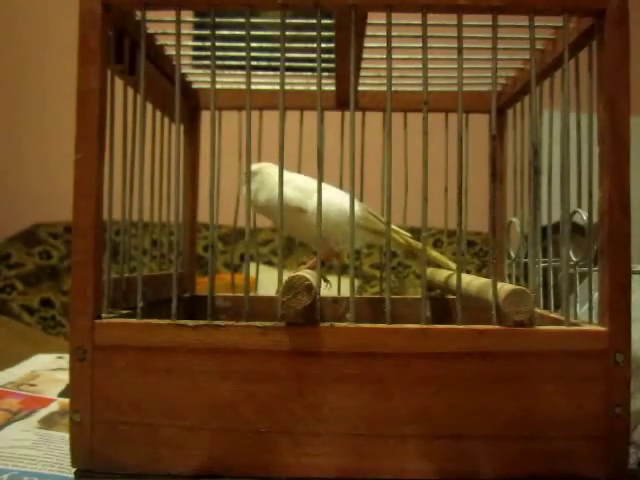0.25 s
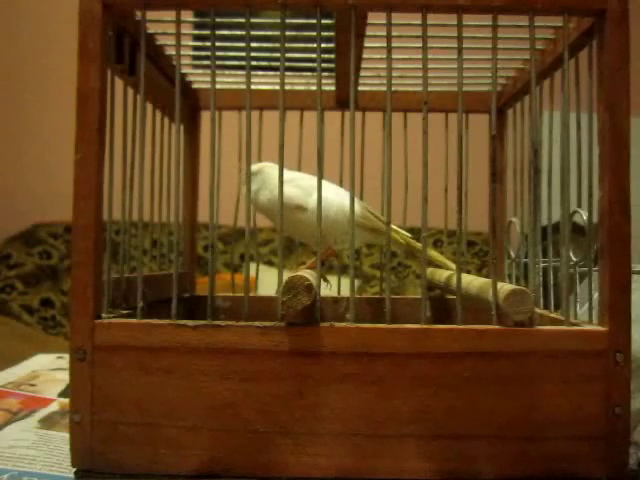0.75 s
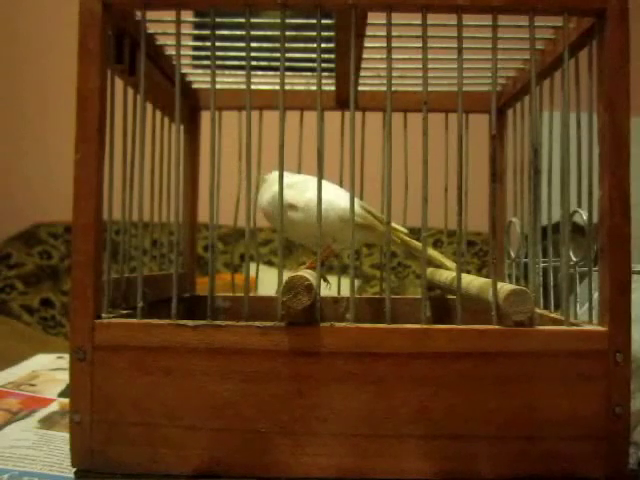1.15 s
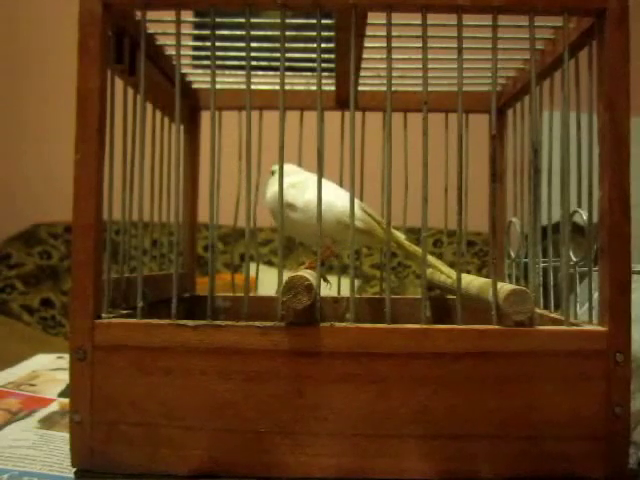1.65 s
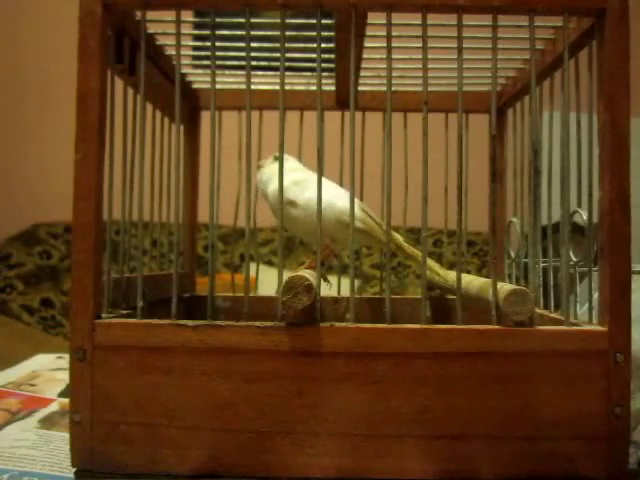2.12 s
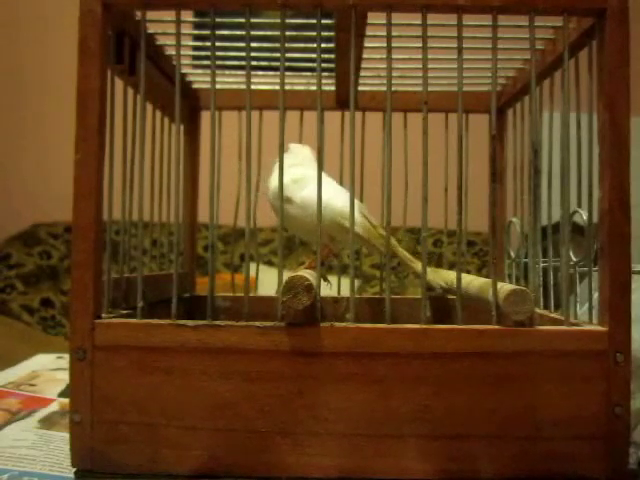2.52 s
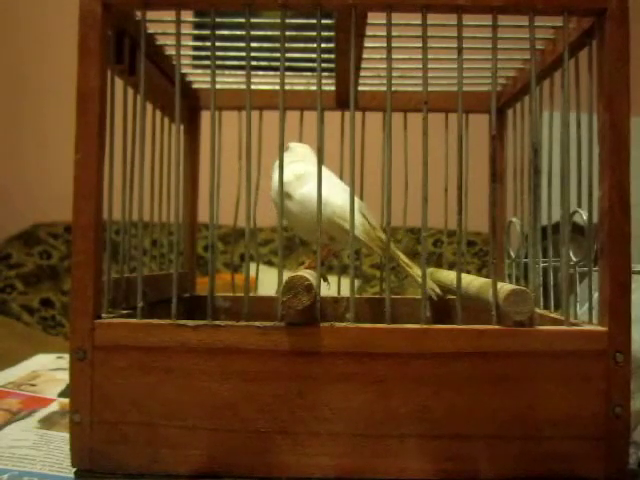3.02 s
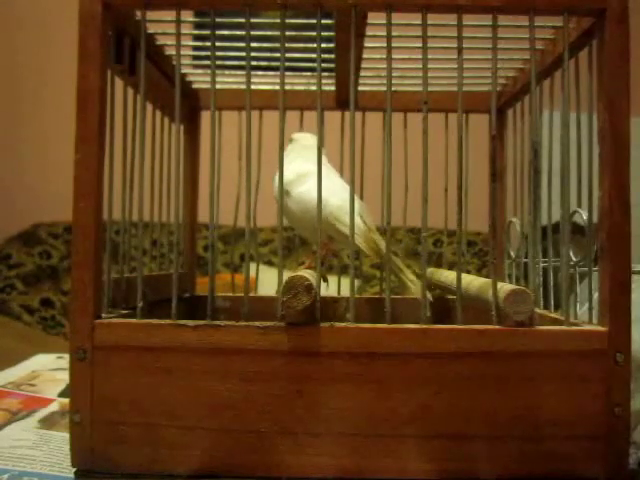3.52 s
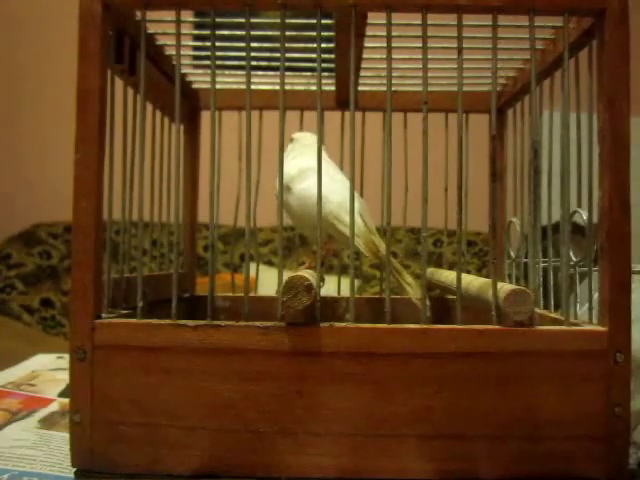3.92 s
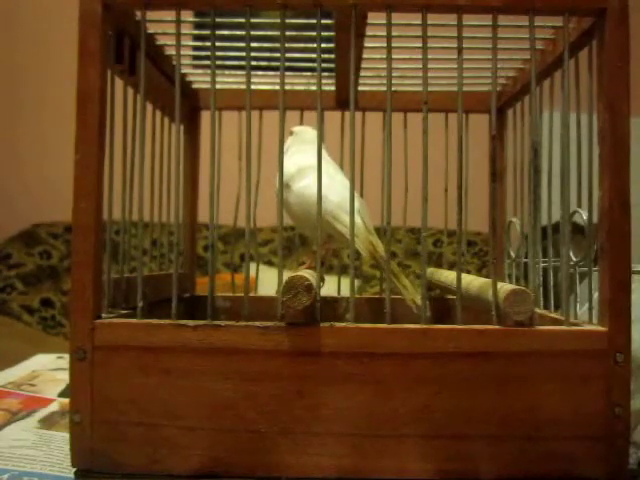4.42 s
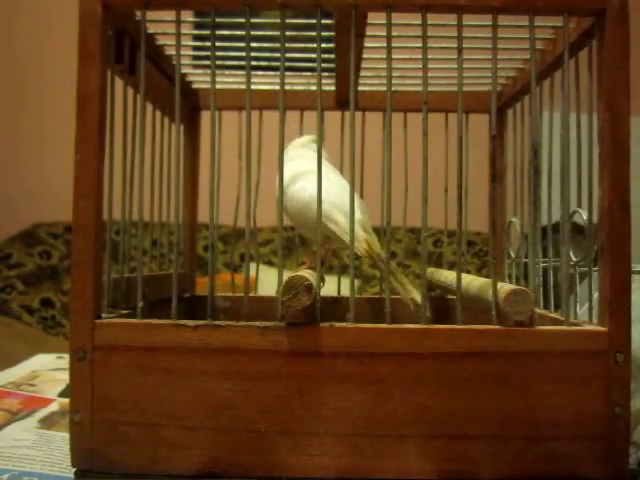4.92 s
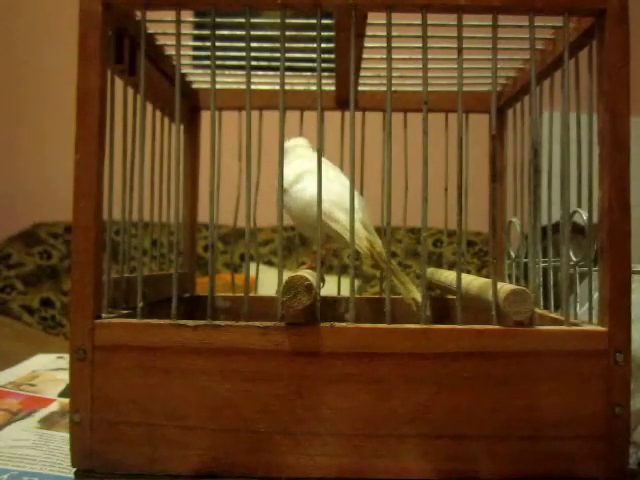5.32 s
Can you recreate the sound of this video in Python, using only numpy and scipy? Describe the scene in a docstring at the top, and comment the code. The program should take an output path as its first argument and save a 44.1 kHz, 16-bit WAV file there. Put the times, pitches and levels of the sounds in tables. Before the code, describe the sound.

Indoors, a canary's thin slurs and short rasps lead into a steady run of loud repeated notes, with faint hoots farther off.

```python
"""Caged canary in a small room.

Soft slurs, thin whistles and harsh rasps, then eight loud repeated syllables, from a wooden cage.
The two sides of the syrinx sound at once and modulate each other.
A faint rising hoot, perhaps another bird, repeats farther off over a low room rumble."""
import sys
import numpy as np
from scipy import signal
from scipy.fft import rfft, irfft, next_fast_len
from scipy.io import wavfile
from scipy.ndimage import map_coordinates

SR = 44100
rng = np.random.default_rng(int(sys.argv[2]) if len(sys.argv) > 2 else 0)


def to_wav(s):
    """Save 16-bit WAV."""
    ch = np.atleast_2d(s).T  # columns
    pcm = np.round(np.clip(ch, -1, 1) * 32767)  # PCM
    wavfile.write(sys.argv[1], SR, pcm.astype(np.int16))


N = 244755
T = np.arange(N) / SR

# Repeated syllables. Each row: accent peak time in seconds, accent level in dB, pitch dip in Hz,
# dip width in seconds, arch height in Hz, time stretch, upper and lower voice levels in dB,
# roughness 0-1, lead of the first tick in seconds.
SYLLABLE_ROWS = [(2.785, -18.5, 200, 0.0046, 554, .86, -37, -44, 0.11, .051),
                 (3.139, -18, 62.5, 0.0029, 546, 0.94, -36, -45, 0.14, 0.056),
                 (3.509, -24.5, 665.5, .012, 702, 0.89, -35, -45, 0.34, .062),
                 (3.873, -18.5, 300, .0082, 534.6, 0.87, -33, -45, 0.22, .058),
                 (4.234, -15, 120, 0.0034, 609, 0.94, -36.5, -43, 0.13, .05),
                 (4.608, -15.5, 79.7, .012, 622, 1.0, -36, -43.5, 0.11, .06),
                 (4.980, -14.5, 419.3, .005, 634, .97, -37, -42, 0.2, .054),
                 (5.353, -16, 23.99, .0035, 673.3, 0.8, -36.5, -41, 0.06, .06)]
# Spectrum of the bird's hiss and scrape. Each row: frequency in Hz, level in dB.
HARSH_SPECTRUM = [(450, -27.5), (750, -4), (1000, 4.5), (1400, -3.5), (2100, 5.5), (2550, -2), (3050, -0.5),
                  (3450, -9), (4200, -18), (6000, -43)]
VOICE_END_S, VOICE_RELEASE_S = 0.25, 0.035  # both voices of a syllable stop together


def syllables():
    """A loud falling accent, then both voices glide up together. Returns accents and soft parts."""
    # Response of the open beak. Each row: frequency in Hz, gain in dB.
    beak_response = [(1000, -9), (3600, 5.5), (4100, -10), (5000, -10), (6000, -26.5)]
    accents, soft, scrape = np.zeros((3, N))
    t = np.arange(-SR // 10, SR // 3) / SR  # zero at the accent peak
    for peak_s, accent_db, dip_hz, dip_s, arch_hz, stretch, upper_db, lower_db, rough, _ in SYLLABLE_ROWS:
        push = np.exp(-(t / 0.012) ** 2)  # bell of air pressure
        sag = np.exp(-np.abs(t / dip_s) ** 3)  # pitch sags and cracks under the push

        lower_hz, lower_gain = lower_contour(t / stretch)
        bright_db = 7 * np.clip(t / 0.4, 0, 1)
        reed = voice(t, lower_hz, [bright_db - 5, bright_db - 22], jitter=0.0071, rough=0.14)
        lower = lower_gain * amp(lower_db + 5 * push + 4.9 * np.tanh(wobble(t, 60))) * reed

        upper_hz, upper_gain = upper_contour(t / stretch, arch_hz)
        upper_hz -= dip_hz * sag
        accent = voice(t, upper_hz, [20 * np.log10(rough) - 4.5], jitter=0.0067, rough=rough)
        accent *= 1 + sag * rough * wobble(t, 3500)
        upper_gain *= amp(upper_db + 4.5 * np.tanh(wobble(t, 55)))
        upper = upper_gain * voice(t, upper_hz, [], jitter=0.0083, rough=0.15 + 0.083 * arch(t / stretch))

        # lower voice modulates upper: faint sum and difference tones
        start_s = peak_s + t[0]
        add(accents, start_s, amp(accent_db) * push * accent * (1 + 0.049 * reed))
        add(soft, start_s, upper * (1 + 0.056 * reed) + lower)
        add(scrape, start_s, amp(accent_db - 29.5) * push)
    accents = filtered(accents, lambda hz: amp(along(beak_response, hz)))
    return accents, soft + scrape * noise(HARSH_SPECTRUM)


def upper_contour(t, arch_hz):
    """Upper voice pitch and gain: swoops down, holds, then arches up unsteadily while fading."""
    held_hz, swoop_hz, swoop_s = 2389.6, 463.7, 0.034
    arch_db, fade_db_per_s = 0.35, 30.5
    swoop = 1 - envelope(t, -swoop_s - 0.008, 1, swoop_s, VOICE_RELEASE_S)
    hz = held_hz + swoop_hz * swoop + arch_hz * arch(t)
    wander = 0.011 * np.sqrt(arch(t)) * wobble(t, 70)
    gate = envelope(t, -0.04147, VOICE_END_S, attack_s=0.025, release_s=VOICE_RELEASE_S)
    return hz * (1 + wander), gate * amp(arch_db * arch(t) - fade_db_per_s * t)


def lower_contour(t):
    """Lower voice pitch and gain: scoops up, then follows the arch a little at even gain."""
    held_hz, scoop_hz, scoop_s, arch_hz = 1555, 104.74, 0.02, 56
    scoop = np.exp(-np.maximum(t + 0.005, 0) / scoop_s)
    hz = held_hz - scoop_hz * scoop + arch_hz * arch(t)
    gate = envelope(t, -0.0233, VOICE_END_S, attack_s=0.007, release_s=VOICE_RELEASE_S)
    return hz * (1 + 0.005 * wobble(t, 14)), gate


def arch(t):
    """Rounded rise of tension late in a syllable, 0-1."""
    peak_s, width_s = 0.174, 0.066
    return np.exp(-np.abs((t - peak_s) / width_s) ** 2.6)


def chucks():
    """Two ticks with a short low ring and a soft hoarse note ahead of each syllable."""
    chuck_hz, tick_t60_s, second_lead_s = 1120, 0.035, 0.044
    out, scrape = np.zeros((2, N))
    t = np.arange(SR // 10) / SR
    tick = amp(-39 - 60 * t / tick_t60_s)
    gain = amp(-46) * envelope(t, 0, 0.034, attack_s=0.0027, release_s=0.019)
    for peak_s, *_, first_lead_s in SYLLABLE_ROWS:
        add(out, peak_s - first_lead_s, gain * voice(t, chuck_hz, [-12], jitter=0.013, rough=0.16))
        add(scrape, peak_s - first_lead_s, amp(-5) * gain)
        for lead_s, db in [(first_lead_s, 0), (second_lead_s, -2.5)]:
            ring = np.sin(2 * np.pi * chuck_hz * rng.normal(1, 0.03) * t)
            add(scrape, peak_s - lead_s, amp(db) * tick)
            add(out, peak_s - lead_s, amp(db - 5) * tick * ring)
    return out + scrape * noise(HARSH_SPECTRUM)


def slurs():
    """Slurs, thin whistles and one echo; each scoops onto a held pitch and off. Rough ones hiss."""
    # Each row: start and length in seconds, start, held and end pitch in Hz, level in dB, roughness 0-1.
    # The row at 0.368 s is the room's fluttering ring after the loud short note.
    tones = [(-.01, .026, 3424, 3305, 2940, -41.5, 0.1), (0.171, 0.05, 2535, 2439, 2480, -35, 0.23),
             (0.203, .06, 2248, 1944, 1980, -36.5, .25), (0.234, .064, 1904, 1944, 1800, -35.5, 0),
             (0.315, 0.033, 1778, 1653, 1600, -34, .1), (0.35, 0.01433, 1615, 1475, 1310, -26.5, 0),
             (0.368, 0.049, 1624, 1558, 1536, -38.5, 0.19), (1.376, .034, 2810, 2605, 2450, -46, 0),
             (1.72, 0.036, 4174, 3882, 3875, -35.5, 0.1), (1.913, 0.057, 1153, 1083, 1055, -42, 0.14),
             (1.996, .035, 4220, 3853, 4020, -31, .06), (2.019, .024, 3930, 3807, 3700, -31, 0),
             (2.261, 0.017, 2920, 2680, 2600, -40.5, 0), (2.299, 0.026, 3200, 3860, 4000, -39.5, .1),
             (2.303, 0.049, 3807, 4006, 3820, -31, 0.05), (2.337, 0.015, 3700, 3329, 3080, -35.5, 0)]
    bend_power, edge_s = 3.7, 0.0077  # higher power: quicker scoops
    out, hiss = np.zeros((2, N))
    for start_s, length_s, start_hz, held_hz, end_hz, db, rough in tones:
        t = np.arange(int(length_s * SR)) / SR
        onto_hz = (start_hz - held_hz) * (1 - t / length_s) ** bend_power
        off_hz = (end_hz - held_hz) * (t / length_s) ** bend_power
        octave_db = -6.5 - 14 * np.log2(held_hz / 1500)  # low tones are reedier
        tone = voice(t, held_hz + onto_hz + off_hz, [octave_db], jitter=0.01, rough=1.4 * rough)
        gain = amp(db) * envelope(t, 0, length_s, edge_s, edge_s)
        add(out, start_s, gain * tone)
        add(hiss, start_s, gain * rough)
    return out + hiss * noise(HARSH_SPECTRUM)


def rasps():
    """Two clashing voices buzz over a hiss, then break into one crack of noise."""
    # Each row: start and lower voice length in seconds, lower and upper pitch in Hz, voice and hiss
    # levels in dB, crack delay in seconds, crack level in dB, crack T60 in seconds.
    calls = [(1.552, 0.028, 1314, 1826, -35, -44, .057, -34.5, 0.16),
             (1.83, .046, 1291, 1858, -36, -42.5, 0.069, -25, 0.027),
             (2.129, .046, 1318, 1780, -34.5, -41, .058, -30, 0.18),
             (2.435, 0.056, 1336, 1768, -34, -39.5, .063, -31, 0.48)]
    upper_delay_s, upper_length_s = 0.018, 0.038
    out, breakup = np.zeros((2, N))
    t = np.arange(SR // 5) / SR
    spread = 1.23 * (t - 0.035)  # the voices drift apart
    for start_s, length_s, lower_hz, upper_hz, db, hiss_db, crack_s, crack_db, crack_t60_s in calls:
        lower = voice(t, lower_hz * (1 - spread), [-9], jitter=0.021, rough=0.1)
        lower *= envelope(t, 0, length_s, attack_s=0.008, release_s=0.0096)
        upper = voice(t, upper_hz * (1 + spread), [-18], jitter=0.018, rough=0.18)
        upper *= envelope(t - upper_delay_s, 0, upper_length_s, attack_s=0.0056, release_s=0.0051)
        add(out, start_s, amp(db) * (lower + amp(-2) * upper * (1 + 0.16 * lower)))
        hiss = amp(hiss_db) * envelope(t, 0, crack_s, attack_s=0.033, release_s=0.01)
        crack = amp(crack_db - 60 * np.abs(t - crack_s) / crack_t60_s)
        crack *= envelope(t - crack_s, -0.002, 0.046, attack_s=0.004, release_s=0.02)
        add(breakup, start_s, (hiss + crack) * amp(2.7 * np.tanh(wobble(t, 260))))
    return out + breakup * noise(HARSH_SPECTRUM)


def voice(t, hz, overtones_db, jitter, rough):
    """One vibrating membrane: a sine with overtones, pitch jitter and fast flutter."""
    phase = 2 * np.pi * np.cumsum(hz * (1 + jitter * wobble(t, 170.9))) / SR
    phase += rough * wobble(t, 800)
    tone = np.sin(phase) + sum(amp(db) * np.sin(k * phase) for k, db in enumerate(overtones_db, 2))
    return np.sqrt(2) * tone * (1 + rough * wobble(t, 600))


def hoots():
    """A far, nearly pure call that swells as it glides, mostly upward."""
    # Each row: start and length in seconds, start and end pitch in Hz, level in dB.
    calls = [(0.143, 0.17, 943, 939, -43), (0.545, 0.25, 909, 922, -43), (0.984, 0.21, 871, 949, -45.5),
             (1.432, 0.23, 874, 956, -45), (1.958, .24, 892, 951, -40.5), (2.532, 0.18, 904, 912, -41.5),
             (2.954, 0.16, 890, 955, -43.5), (4.114, .23, 935, 932, -43.5), (4.536, 0.26, 900, 924, -43),
             (4.996, 0.2, 887, 947, -46), (5.43, 0.26, 873, 980, -46)]
    peak_share, flutter_db = 0.71, 2.2
    out = np.zeros(N)
    for start_s, length_s, start_hz, end_hz, db in calls:
        t = np.arange(int(length_s * SR)) / SR
        hz = start_hz + (end_hz - start_hz) * (t / length_s) ** 0.87
        level_db = db - 6.5 * np.abs(t / length_s - peak_share) + flutter_db * np.tanh(wobble(t, 35))
        gain = amp(level_db) * envelope(t, 0, length_s, attack_s=0.012, release_s=0.0067)
        add(out, start_s, gain * voice(t, hz, [-28], jitter=0.007, rough=0.035))
    return out


def background():
    """Low rumble and wavering drone, each swelling once, over even room noise."""
    # Noise spectra. Each row: frequency in Hz, level in dB.
    rumble_spectrum = [(15, -19), (25, -5), (40, 0.5), (60, -4.5), (90, 5), (120, -4), (200, -14),
                       (400, -65.5)]
    drone_spectrum = [(110, -50.5), (135, -1.5), (146, 1), (160, -4), (190, -20), (235, -11.5), (290, -9),
                      (350, -17), (600, -55.5)]
    hiss_spectrum = [(110, -5), (180, 6), (260, 5), (340, 1.5), (470, 0.5), (700, -1.5), (1200, -3.5),
                     (2000, -6), (3200, -8), (4500, -9), (5500, -11.5), (6300, -17.5), (7200, -35)]
    rumble = swell(db=-54, rise_db=6.5, peak_s=3.27, width_s=0.91) * noise(rumble_spectrum)
    waver = amp(1.2 * wobble(T, 6))
    drone = swell(db=-51.5, rise_db=7.5, peak_s=2.02, width_s=1.3) * waver * noise(drone_spectrum)
    return rumble + drone + amp(-46.5) * noise(hiss_spectrum)


def room(x, wet_db):
    """Direct sound plus a diffuse tail and six single echoes from cage and near walls."""
    # Room decay. Each row: frequency in Hz, T60 in seconds.
    decay_times = [(500, 0.63), (2000, 0.3), (4000, 0.24), (7000, 0.15)]
    hz, t, spectra = signal.stft(rng.standard_normal(SR // 2), SR, nperseg=256)
    decay = amp(-60 * t / along(decay_times, hz)[:, None])
    tail = signal.istft(spectra * decay, SR, nperseg=256)[1]
    tail *= np.clip(np.arange(len(tail)) / SR / 0.004, 0, 1)  # first echoes take a moment to return
    tail /= np.linalg.norm(tail)
    echoes_s = rng.uniform(0.009, 0.042, size=6)
    tail[(echoes_s * SR).astype(int)] += amp(-13)
    return x + amp(wet_db) * signal.fftconvolve(x, tail / np.linalg.norm(tail))[:N]


def envelope(t, start_s, end_s, attack_s, release_s):
    """Attack, hold and release between two times."""
    ramp = np.minimum((t - start_s) / attack_s, (end_s - t) / release_s)
    return np.sin(np.pi / 2 * np.clip(ramp, 0, 1)) ** 2


def swell(db, rise_db, peak_s, width_s):
    """Gain that rises once and sinks back."""
    return amp(db + rise_db * np.exp(-((T - peak_s) / width_s) ** 2))


def wobble(t, rate_hz):
    """Smooth random curve with knots at rate_hz."""
    at = (t - t[0]) * rate_hz
    return map_coordinates(rng.standard_normal(int(at[-1]) + 4), [at])


def noise(spectrum):
    """Coloured noise of rms 1."""
    x = filtered(rng.standard_normal(N), lambda hz: amp(along(spectrum, hz)))
    return x / np.sqrt(np.mean(x ** 2) + 1e-20)


def filtered(x, response):
    """Multiply the spectrum of x by response(hz)."""
    size = next_fast_len(len(x) + 8192)
    return irfft(rfft(x, size) * response(np.fft.rfftfreq(size, 1 / SR)), size)[:len(x)]


def along(points, hz):
    """Interpolate (Hz, value) points on a log axis."""
    knots_hz, values = np.transpose(points)
    return np.interp(np.log(hz + 1), np.log(knots_hz + 1), values)


def amp(db):
    """Decibels to gain."""
    return 10 ** (np.asarray(db) / 20)


def add(track, start_s, sound):
    """Mix a sound into the track."""
    at = round(start_s * SR) + np.arange(len(sound))
    inside = (at >= 0) & (at < N)
    track[at[inside]] += sound[inside]


def scene():
    """Accents are aimed at the listener; softer notes come more by way of the room."""
    accents, soft = syllables()
    song = room(slurs() + rasps(), wet_db=-4.5)
    song += room(accents, wet_db=-10.5)
    song += room(soft + chucks(), wet_db=-5)
    return (song + room(hoots(), wet_db=-9.5) + background())[None]


def record(dry):
    """Brick-wall low-pass."""
    top_hz = 7380
    return np.array([filtered(x, lambda hz: hz < top_hz) for x in dry])


dry = scene()
out = record(dry)
to_wav(out)
```